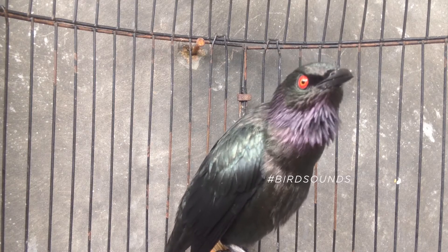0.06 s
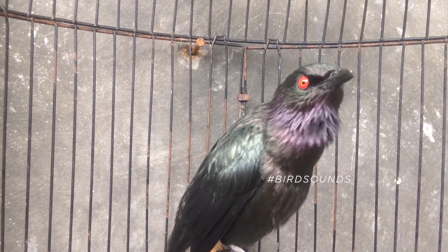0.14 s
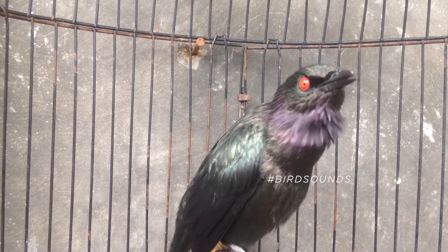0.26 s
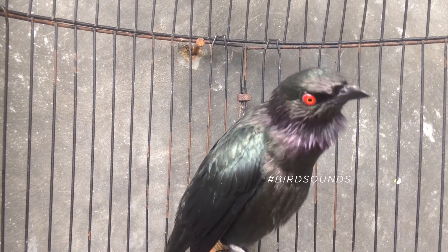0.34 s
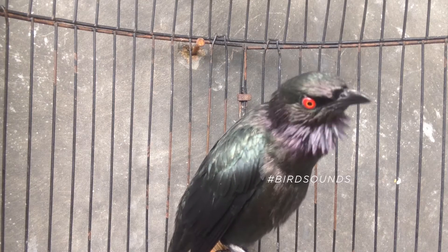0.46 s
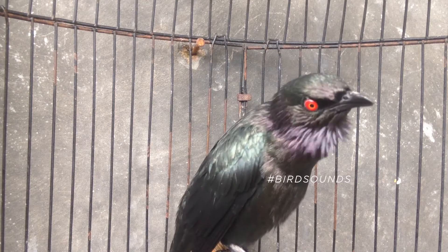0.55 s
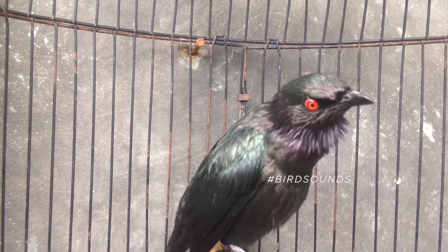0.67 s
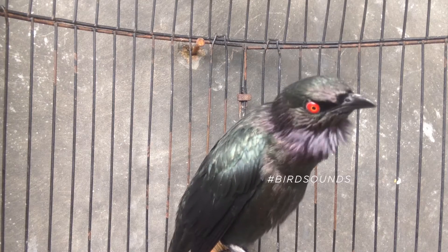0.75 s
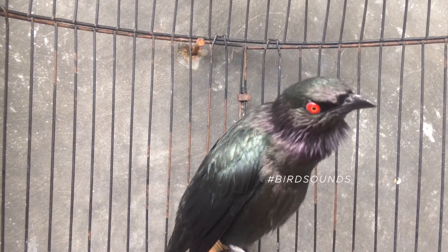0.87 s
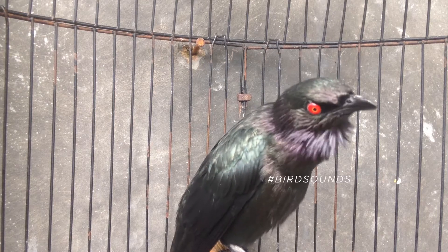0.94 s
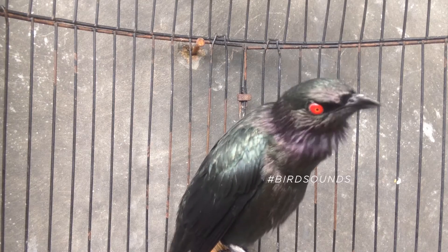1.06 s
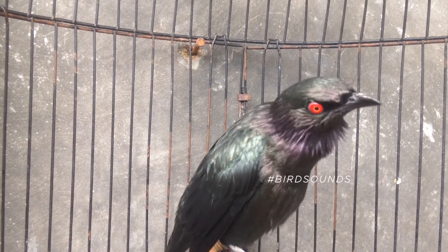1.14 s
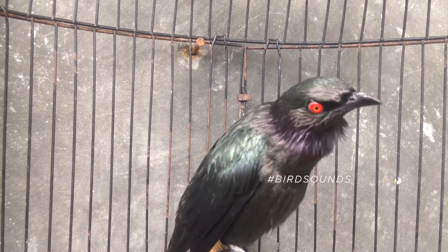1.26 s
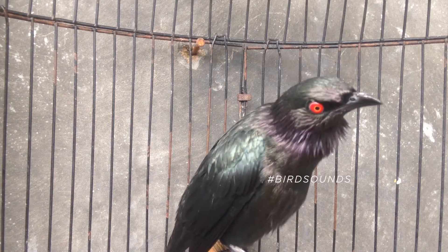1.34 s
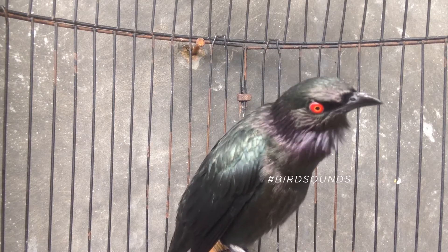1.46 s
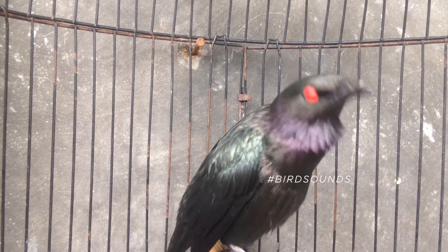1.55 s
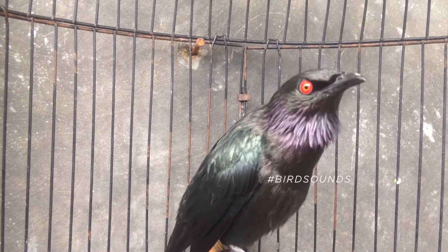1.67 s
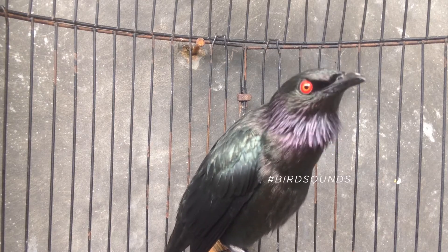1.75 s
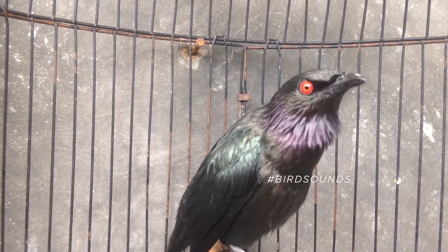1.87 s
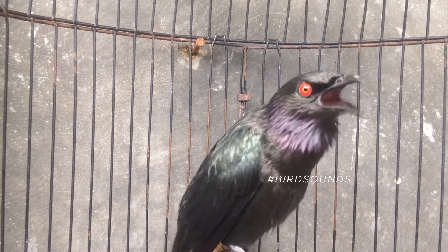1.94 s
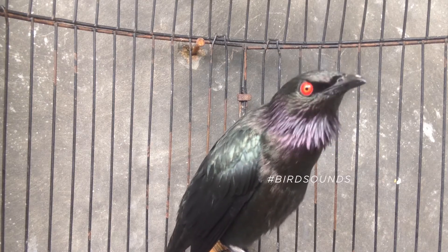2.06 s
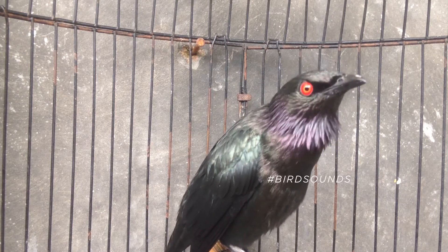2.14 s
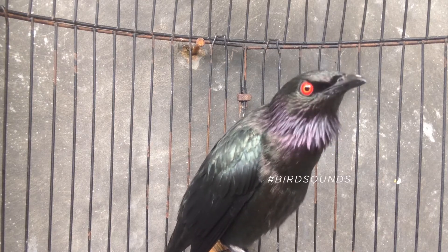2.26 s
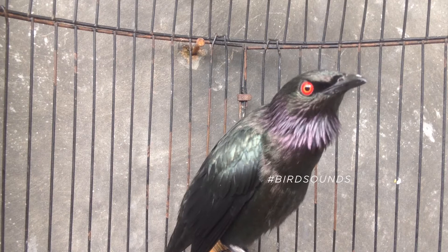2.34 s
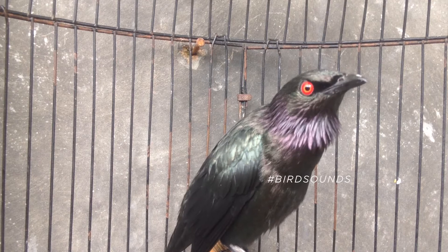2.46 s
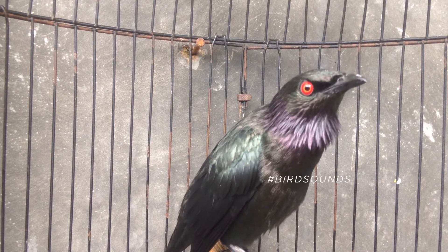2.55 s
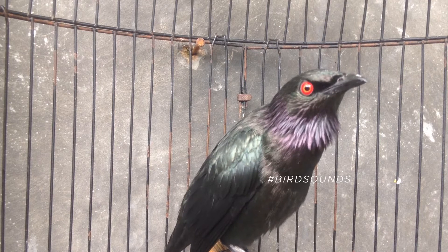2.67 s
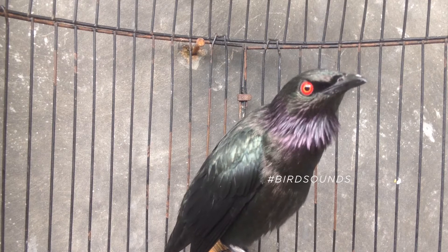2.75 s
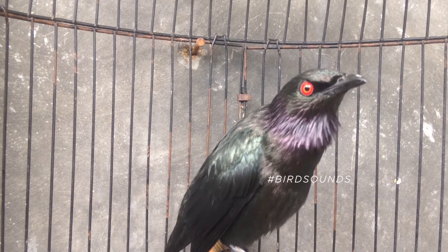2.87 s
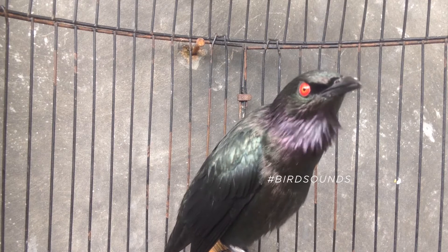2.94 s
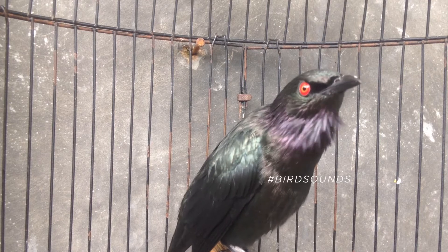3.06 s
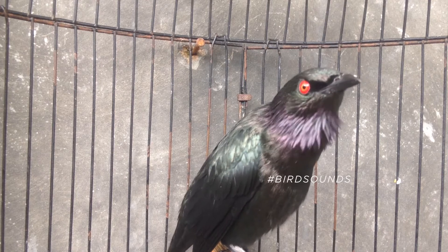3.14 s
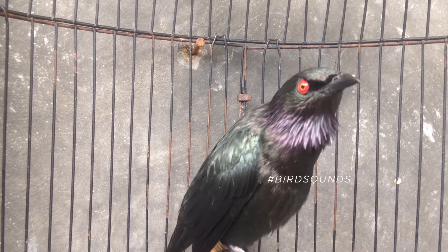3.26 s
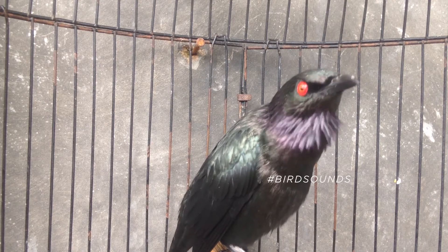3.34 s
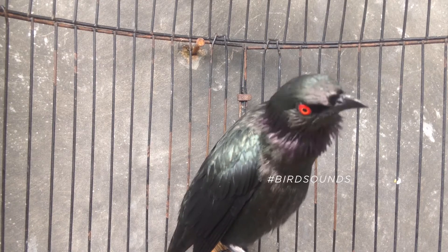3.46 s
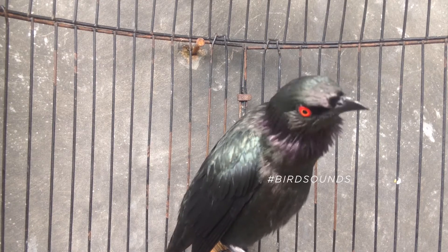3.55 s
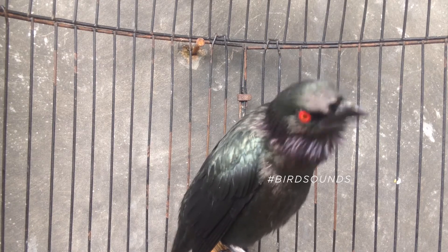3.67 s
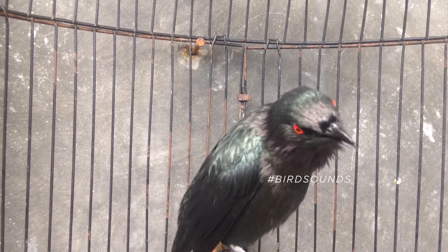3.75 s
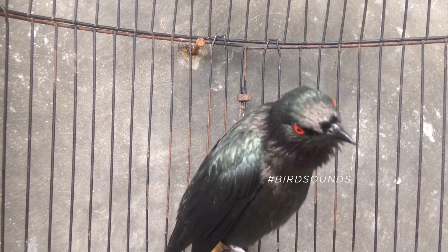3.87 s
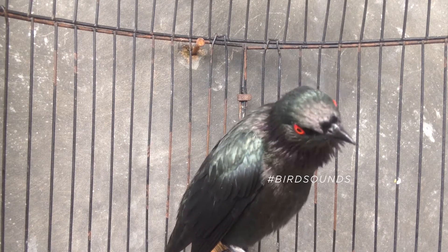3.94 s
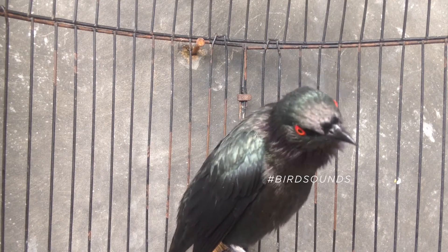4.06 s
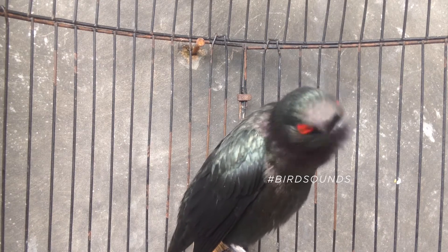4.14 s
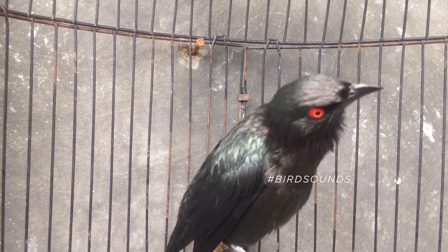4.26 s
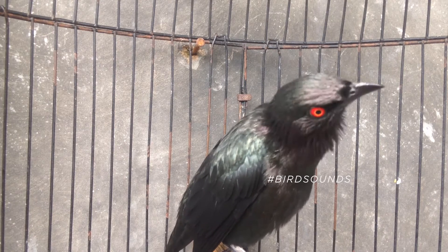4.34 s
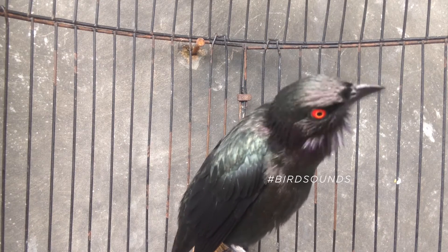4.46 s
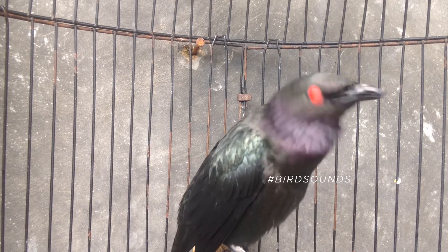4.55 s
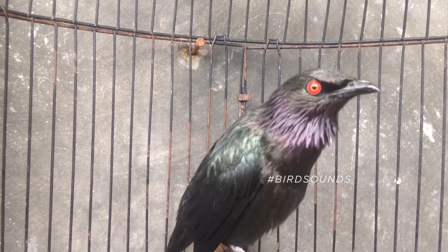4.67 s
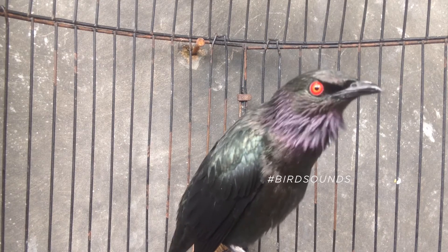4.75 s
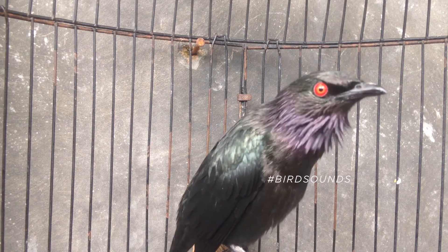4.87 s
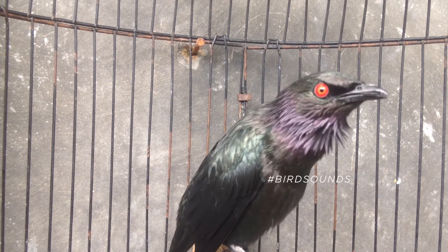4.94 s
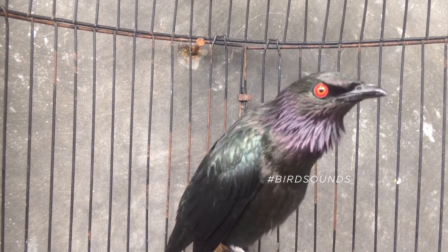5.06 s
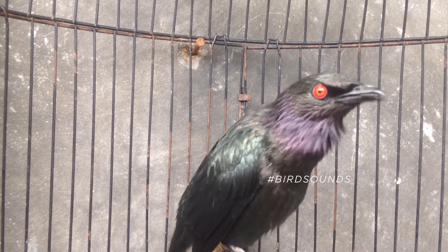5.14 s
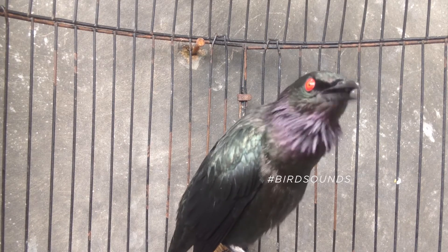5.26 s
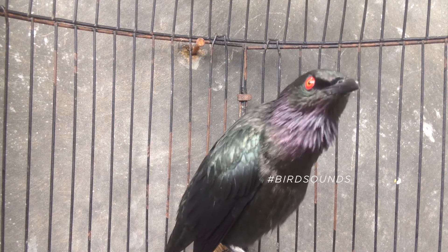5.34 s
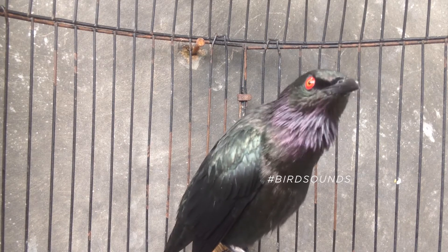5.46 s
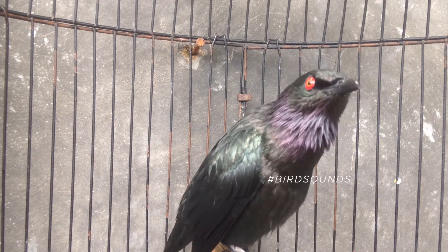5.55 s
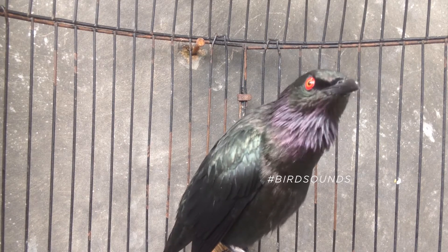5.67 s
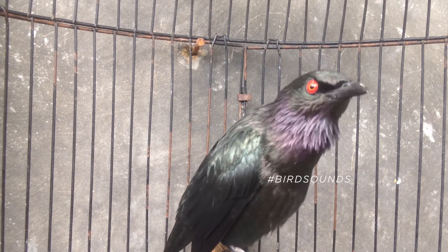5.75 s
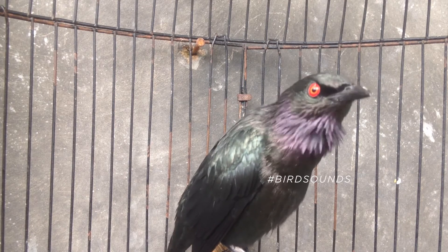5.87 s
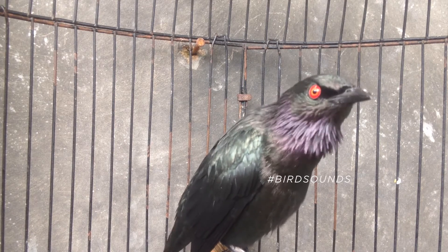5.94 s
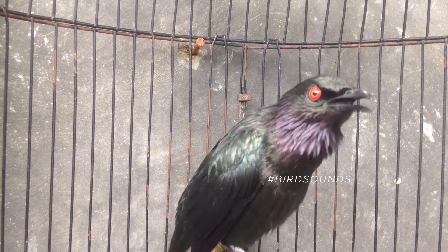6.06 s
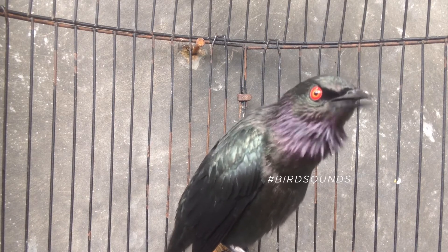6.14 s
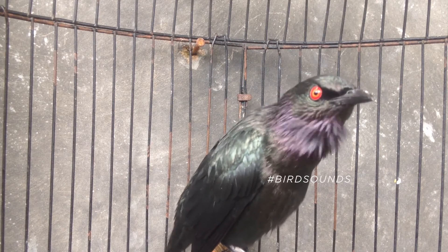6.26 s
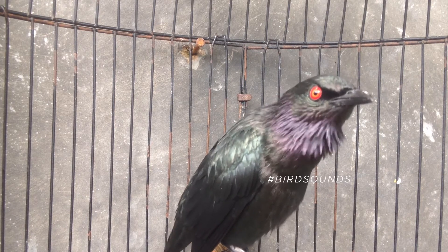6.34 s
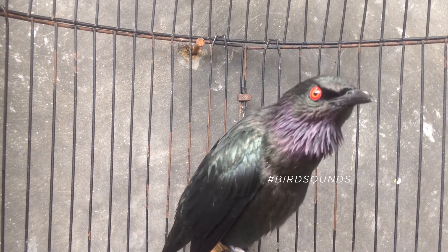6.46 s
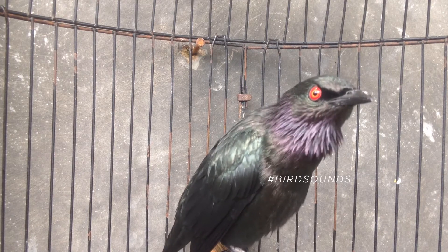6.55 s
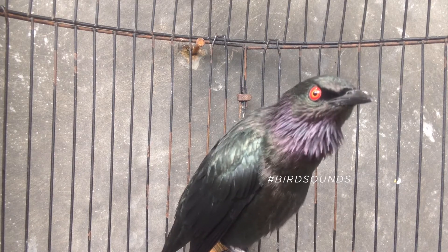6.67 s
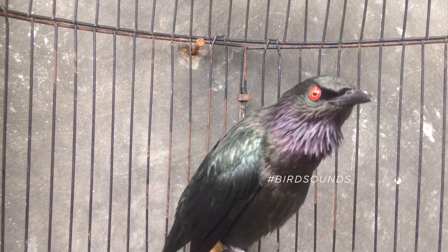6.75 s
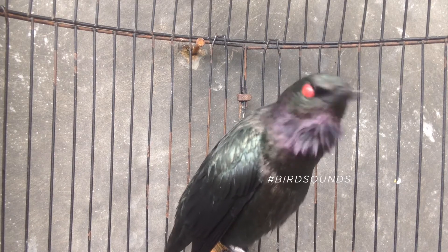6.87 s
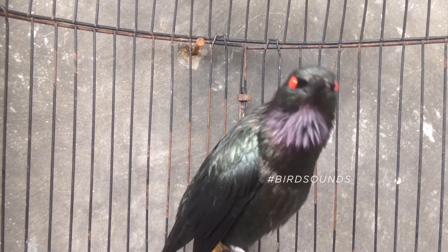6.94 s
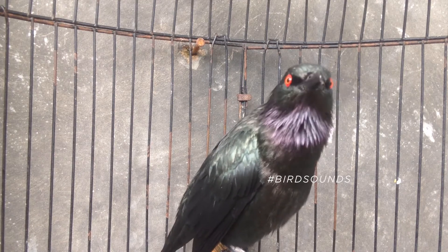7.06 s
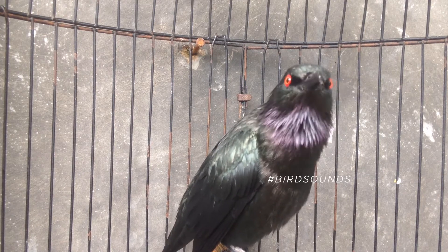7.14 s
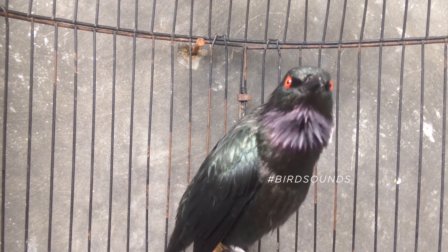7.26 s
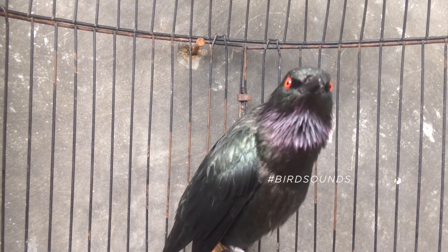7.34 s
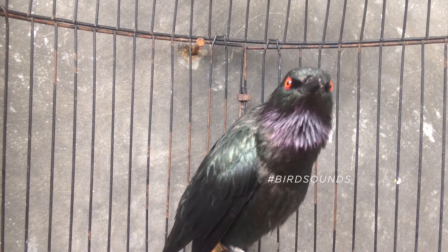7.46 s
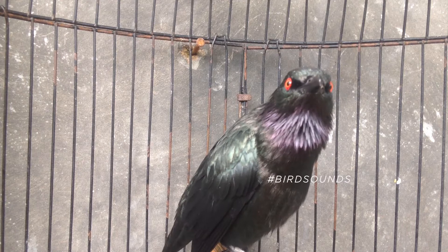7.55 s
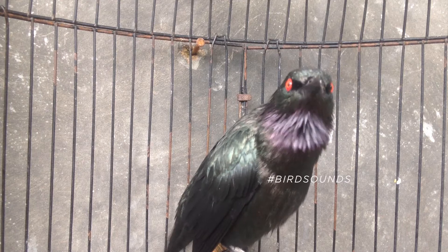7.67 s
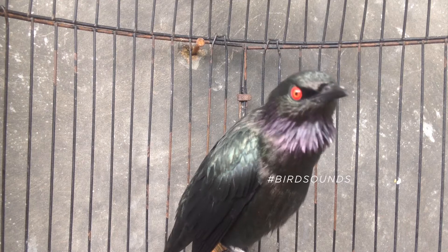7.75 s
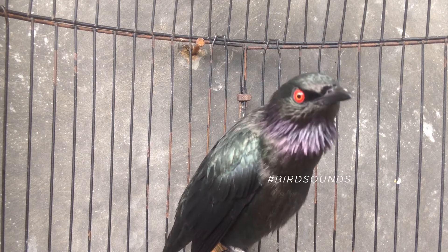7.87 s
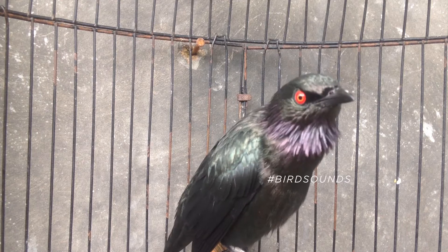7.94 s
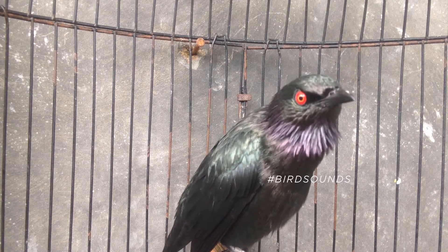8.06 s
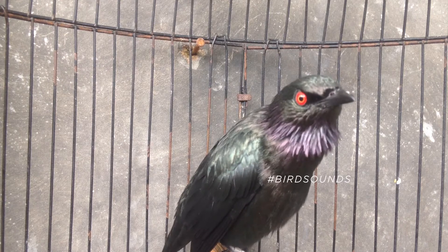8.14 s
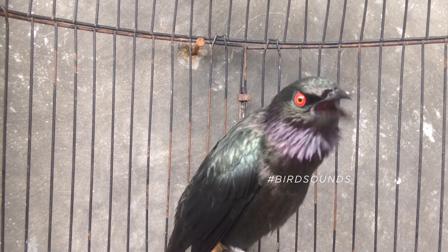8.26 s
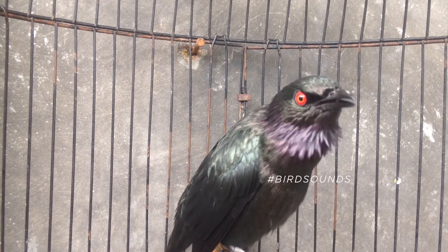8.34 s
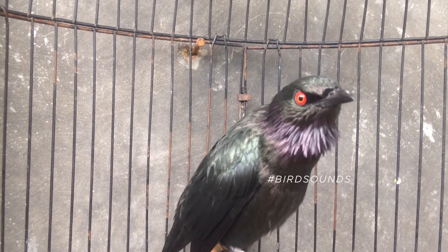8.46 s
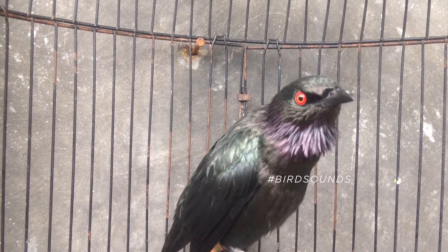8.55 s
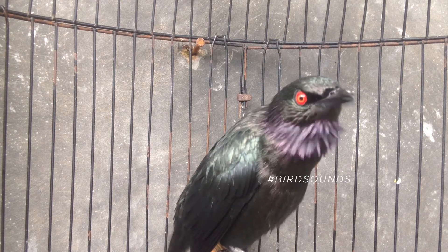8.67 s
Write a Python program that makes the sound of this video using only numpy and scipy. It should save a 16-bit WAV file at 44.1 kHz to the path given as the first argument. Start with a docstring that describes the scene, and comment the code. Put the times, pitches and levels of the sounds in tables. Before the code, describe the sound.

A close caged starling sings in a walled yard with short echoes. Low engine hum and airy hiss start clearer, then the hum fades by 1.6 s and remains faint to the end at 8.7 s. Quick chirps and a short rasp come at 0.1-0.4 s, hoarse warbled squeaks at 0.5-0.9, then a stepped metallic cluster at 1.05-1.2. The loudest piercing chirp hits at 2.0; background dips, then distant whistles answer until 3. A rattling croak at 3.2, small clicks at 3.5, a bright cluster at 3.8, another croak at 4.2. Squeaks at 4.55-5.0 and sharp whistled steps at 5.3-5.4 follow. A strong whistle rings at 6.2, a trilled low note near 7, a weak squeak at 7.3, low yelps at 7.8 and 8.0, and a rising squeal at 8.35-8.5. Sparrows chirp throughout; thin insect buzz runs 1.4-5.6, with soft cooing pulses around 2.1, 3.3 and 7.

```python
"""Distant birds whistle in a walled yard over engine hum and air hiss, made of filtered noise, to the end.
Almost at once a caged starling sings close by, in chirps, stepped whistles, trills and rasps: stacks of
overtones shaped by a throat. Short hisses and rasps of shaped noise come from it or another bird, and
sparrows chirp as rough sliding tones. Later insects buzz as thin bands of noise, soft pulses coo, perhaps
a far dove, croaks follow, and long whistles sweep near the end. Gain control ducks after loud notes."""
import sys
import numpy as np
from scipy import signal
from scipy.fft import rfft, irfft, next_fast_len
from scipy.io import wavfile
from scipy.ndimage import uniform_filter1d

SR = 44100
rng = np.random.default_rng(int(sys.argv[2]) if len(sys.argv) > 2 else 0)


def to_wav(s):
    """Save 16-bit WAV."""
    ch = np.atleast_2d(s).T  # columns
    pcm = np.round(np.clip(ch, -1, 1) * 32767)  # PCM
    wavfile.write(sys.argv[1], SR, pcm.astype(np.int16))


N = 383669

# All levels are those before the gain control.
# Yard background. Each row: time in seconds, hum level in dB, hiss level in dB.
YARD = [(0.0, -32, -43.5), (1.602, -46.5, -45.5), (8.7, -46, -49)]
# Far engines. Each row: pitch in Hz, half width in Hz, relative level in dB.
HUM = [(55.43, 5.2, 4), (112, 12, -7.5)]
# Colour of the air hiss. Each row: frequency in Hz, relative level in dB per Hz.
HISS = [(30, -15.5), (81, 4), (307, -15), (2910, -24.5), (6890, -38), (15500, -55.5)]
# Thin buzzes. Each row: start in seconds, end in seconds, pitch in Hz, middle level in dB.
INSECTS = [(1.42, 1.8, 9830, -73), (1.75, 5.6, 12490, -76.5)]
# Groups of soft low pulses. Each entry: time of the first pulse in seconds.
COOS = [2.067, 3.27, 6.95]
COO_GAP_S, COO_HZ, COO_DB = .055, 420, -39.5
# Distant whistles, one list each. Each row: time in seconds, pitch in Hz, level in dB.
FAR_WHISTLES = [
    [(0.0, 2750, -43), (0.1, 2740, -82)],
    [(1.17, 3048, -38.5), (1.35, 2623, -41), (1.58, 2743, -48.5)],
    [(2.21, 2310, -45.5), (2.31, 2820, -46), (2.4, 2302, -39.5), (2.5, 1957, -51.5), (2.6, 2750, -37),
     (2.68, 3137, -34), (2.75, 3080, -60)],
    [(2.87, 3800, -39.5), (2.89, 7470, -43.5), (2.96, 5430, -48.5), (3.03, 5060, -46)],
    [(4.24, 4630, -50), (4.33, 3815, -41), (4.56, 3266, -45.5)],
    [(3.23, 5320, -53), (3.4, 4520, -70)],
    [(.205, 5810, -45), (.3, 5850, -46)],
    [(5.5, 3060, -53.5), (5.7, 2887, -57.5)],
    [(5.59, 2276, -54), (5.77, 1966, -60)],
    [(6.505, 3330, -53), (6.56, 3340, -37)],
    [(6.36, 2511, -39.5), (6.55, 2504, -55)],
]
# Chirps of other birds. Each row: start in seconds, level in dB, highest pitch aimed at in Hz,
# length in seconds.
SPARROWS = [(0.373, -41, 5530, 0.081), (0.8, -34.5, 3804, 0.11), (1.757, -37.5, 4090, 0.032),
            (1.845, -34.5, 4160, 0.025), (1.945, -36.5, 4080, 0.043), (3.643, -42, 3055, 0.056),
            (5.836, -47.5, 3940, 0.19), (6.05, -52.5, 3860, 0.3), (6.559, -39.5, 3640, 0.03),
            (7.396, -42.5, 3810, 0.062), (7.51, -38.5, 3675, 0.028), (7.727, -36, 3720, 0.033),
            (8.448, -41.5, 3770, 0.081), (8.596, -36.5, 3726, 0.03), (8.635, -38.5, 3960, .035)]
CHATTER_HZ, SAG = 60, 0.12  # chirps are chopped about this often; share of pitch lost at their length

# How the throat favours some frequencies. Each row: frequency in Hz, relative level in dB.
THROAT = [(1500, -6.5), (3300, 8.5), (5000, 2.5), (6800, -5), (9000, -9), (16000, -28)]
# Short hisses and rasps, from the near bird or another. Each row: start in seconds, length in seconds,
# level in dB.
RASPS = [(0.199, .29, -46.5), (3.15, .03, -46.5), (4.844, .045, -42.5), (5.137, 0.058, -45.5),
         (6.892, 0.046, -46)]
# Shaken notes. Each row: start in seconds, end in seconds, rate in Hz, pitch swing 0-1, level swing 0-1.
TRILLS = [(0.53, 0.597, 297.6, 0.2, 0.7), (6.955, 7.05, 193.5, 0.09, 0.08)]
# Alternate cycles differ. Each row: start in seconds, end in seconds, half-pitch strength in dB.
HALVED = [(8.308, 8.4, 0.5)]
# Hoarse spells. Each row: start in seconds, end in seconds, added roughness in dB.
HOARSE = [(0.538, 0.718, -8), (0.83, 0.869, -9), (3.76, 3.84, -9), (1.04, 1.12, -10), (4.55, 4.64, -9)]
SLIDE_ROUGH_S = .008  # roughness gained per unit of relative pitch change a second
# Brief loud catches inside croaking notes. Each entry: time in seconds.
CATCHES = [.845, 3.236, 4.226]
CATCH_DB = 7
# Croaks. Each row: start in seconds, peak level in dB.
CROAKS = [(3.17, -31.5), (4.161, -30.5)]
CROAK_S, CROAK_FROM_HZ, CROAK_HZ, DROP_S = .098, 2150, 800, .011  # the pitch drops fast, then rests
CROAK_FADE_DB, CROAK_SLOPE_DB, CROAK_RASP_DB = 8, -2, -13
RATTLE_HZ, RATTLE_PITCH, RATTLE_LEVEL = 540, .2, .5  # the croak's second membrane: rate and swings 0-1
# The beak is shut for notes starting near these times. Each entry: time in seconds.
CLOSED = [.815, 3.48, 7.33] + [s for s, _ in CROAKS]
CLOSED_SHIFT = .76  # a shut beak lowers the ring of the throat by this ratio

# Curved glides. Each row: start in seconds, length in seconds, from Hz, to Hz, bend (over 1 moves late,
# under 1 early), peak level in dB, peak place 0-1, fade from the peak to both ends in dB,
# overtone slope in dB per octave.
GLIDES = [ (.105, 0.036, 2015, 750, 1.37, -22, 0.35, 14.5, -3),
          (.325, 0.041, 4220, 3040, 1.44, -17, 0.86, 21.5, -4),
          (.638, 0.078, 1770, 1543, 2, -23, 0, 21, -1), (1.992, 0.054, 4420, 2775, 5, -11, 0.96, 29, 8),
          (2.047, 0.039, 4990, 5044, 0.5, -8, 0.1, 11.5, 5.5),
          (4.645, 0.053, 1587, 2042, 6.8, -20, 0.58, 12.5, 0), (5.003, .1, 1918, 1407, 2.37, -28, 0, 8, -4),
          (6.952, 0.099, 1323, 1175, 1, -28.5, 0, 30.5, -23.5)]
# Short straight steps. Each row: start in seconds, length in seconds, from Hz, to Hz, peak level in dB.
STEPS = [(0.301, 0.02, 4120, 4250, -25), (.538, .051, 1351, 1700, -30.5), (1.044, 0.015, 1927, 4330, -29.5),
         (1.087, 0.027, 1797, 1745, -21), (1.106, 0.016, 3257, 3266, -16.5),
         (1.119, 0.026, 2118, 2251, -15.5), (1.141, 0.026, 3006, 3156, -21.5),
         (1.322, .024, 1132, 799.7, -31), (1.586, 0.041, 1168, 794, -39.5),
         (3.015, 0.027, 1670, 1368, -32.5), (3.461, .015, 1042, 916, -29.5), (3.48, 0.014, 1008, 924, -28),
         (3.493, .04, 1119, 980.5, -33.5), (3.764, 0.023, 2010, 3294, -27.5),
         (3.781, 0.035, 2470, 2403, -17.5), (3.789, .024, 3580, 3430, -19.5),
         (3.815, 0.013, 1661, 1637, -17.5), (3.831, 0.01, 2950, 2804, -20), (3.836, 0.027, 2117, 2080, -15),
         (3.863, 0.029, 3120, 3138, -14.5), (4.554, 0.022, 1910, 3375, -27.5),
         (4.616, 0.018, 1565, 1633, -23.5), (4.876, 0.019, 1656, 1347, -32),
         (4.892, 0.043, 1178, 935, -33.5), (4.957, 0.05, 3164, 2630, -27.5),
         (5.294, 0.013, 3695, 3420, -22), (5.341, 0.04, 2330, 2600, -22.5),
         (5.964, 0.038, 2447, 1599, -28.5), (6.382, 0.053, 1486, 1370, -35.5),
         (6.928, .02, 2814, 2697, -21.5)]
STEP_PEAK, STEP_FADE_DB = .45, 3  # place of the peak 0-1; loss from there to both ends
# Overtone slope at -18 dB and 2 kHz; louder is brighter, higher is purer.
STEP_SLOPE_DB, PER_LEVEL, PER_OCTAVE_DB = 0, 0.86, -7.5
# Notes held steady that drop or flick up at the very end. Each row: start in seconds, length in seconds,
# from Hz, to Hz, peak level in dB, overtone slope in dB per octave.
HOOKS = [(0.647, .049, 2161, 2990, -28.5, -11), (1.065, .031, 3076, 1847, -16, -6.5),
         (4.573, 0.037, 2888, 2370, -20.5, -9), (5.267, 0.026, 4117, 3070, -30, -2.5),
         (5.378, .028, 3840, 2890, -16.5, -9.5)]
HOOK_BEND = 4.5
# Notes that rise to a flat top and fall again. Each row: start in seconds, length in seconds, from Hz,
# top Hz, to Hz, top place 0-1, peak level in dB, overtone slope in dB per octave.
ARCHES = [(0.582, 0.06, 1882, 2377, 2155, 0.75, -25, -8), (0.82, .057, 957, 1106, 894, 0.4, -30.5, -1),
          (5.307, .023, 2430, 3446, 2693, .45, -14.5, -11),
          (5.331, .019, 2694, 3487, 3070, 0.6, -18.5, -17), (7.776, .042, 822, 1121, 790, 0.6, -20.5, 1),
          (8.001, 0.056, 920, 1092, 809, 0.3, -21, -0.5)]
FLAT_TOP, ARCH_FADE_DB = 3.1, 12  # power of the fall from the top; level lost at both ends
# Free whistles. Each row: overtone slope in dB per octave, then a list of points, each with time in
# seconds, pitch in Hz, level in dB.
SWEEPS = [ (-3.5, [(6.16, 4790, -39), (6.167, 3764, -30), (6.175, 4540, -23.5), (6.215, 4735, -11),
          (6.247, 4400, -13.5), (6.265, 3187, -14)]), (-6.5, [(7.33, 759, -38), (7.338, 1314, -34),
          (7.352, 2042, -40), (7.366, 1378, -30), (7.374, 1010, -34.5)]), (-8.5, [(8.326, 2946, -38),
          (8.345, 3876, -33), (8.395, 3620, -33), (8.415, 3870, -30.5), (8.455, 4700, -16),
          (8.476, 4154, -20)])]
# A note that follows another within JOINED_S slides over from its last pitch.
SLUR_S, JOINED_S = .0018, .006

DUCK_FROM_DB, DUCK_POWER, RECOVER_S = -27, 0.25, 0.26  # gain control
TOP_HZ = 15600  # nothing is kept above this


def amp(db):
    """Turn decibels into a plain factor."""
    return 10 ** (np.asarray(db) / 20)


def unit(x):
    """Scale a sound to rms 1."""
    return x / np.sqrt(np.mean(x ** 2) + 1e-20)


def along(points, hz):
    """Read a value between (Hz, value) points on a log axis."""
    f, v = np.transpose(points)
    return np.interp(np.log(hz + 1), np.log(f + 1), v)


def filtered(x, response):
    """Multiply the spectrum of x by a response of frequency."""
    m = next_fast_len(len(x) + 8192)
    spectrum = rfft(x, m) * response(np.fft.rfftfreq(m, 1 / SR))
    return irfft(spectrum, m)[:len(x)]


def noise(count, response):
    """Coloured noise of rms 1."""
    return unit(filtered(rng.standard_normal(count), response))


def soft(count, hz):
    """A smooth random curve of rms 1 that moves about hz times a second."""
    return noise(count, lambda f: 1 / (1 + (f / hz) ** 2))


def gate(t, start, end, edge):
    """1 between start and end, with soft edges."""
    return np.clip(np.minimum(t - start, end - t) / edge, 0, 1)


def swell(u, db, place, fade_db):
    """Gain that peaks at a place 0-1 in the note; also the distance 0-1 from that place."""
    away = np.where(u < place, 1 - u / place, (u - place) / (1 - place))
    return amp(db - fade_db * away ** 2), away


def read(note, edge):
    """First sample, times, pitch and gain of a note given as points."""
    s, hz, db = np.transpose(note)
    first = round(s[0] * SR)
    t = np.arange(first, round(s[-1] * SR)) / SR
    rounding = round(np.diff(s).min() * SR / 2)  # pitch corners are rounded over half the shortest step
    hz = uniform_filter1d(np.interp(t, s, hz), rounding, mode="nearest")
    return first, t, hz, amp(np.interp(t, s, db)) * gate(t, s[0], s[-1], edge)


def echoes(x, t60):
    """The yard walls answer with a dying noise tail, drawn anew every quarter second."""
    wet, step, t = np.zeros(N + SR), SR // 4, np.arange(SR // 2) / SR
    for k in range(0, N, step):
        tail = rng.standard_normal(len(t)) * amp(-60 * t / t60) * np.minimum(t / .01, 1)
        part = signal.fftconvolve(x[k:k + step], tail / np.linalg.norm(tail))
        wet[k:k + len(part)] += part
    return wet[:N]


def yard():
    """Engine hum is noise peaking at a few low pitches; air hiss is patchy broad noise."""
    t = np.arange(N) / SR
    s, hum_db, hiss_db = np.transpose(YARD)
    hum = noise(N, lambda f: sum(amp(db) / (1 + ((f - hz) / wide) ** 2) for hz, wide, db in HUM))
    hiss = noise(N, lambda f: amp(along(HISS, f)))
    hum_gain = amp(np.interp(t, s, hum_db))
    hiss_gain = amp(np.interp(t, s, hiss_db) + soft(N, hz=2.8))
    return hum_gain * hum + hiss_gain * hiss


def insects():
    """Narrow high bands of noise that swell a little."""
    out, t = np.zeros(N), np.arange(N) / SR
    for start, end, hz, db in INSECTS:
        buzz = noise(N, lambda f: np.exp(-((f - hz) / 300) ** 2))
        gain = amp(db + 2.5 * soft(N, hz=2.6)) * gate(t, start, end, 0.039)
        out += gain * buzz
    return out


def coos():
    """Soft low pulses in groups of four, perhaps a far dove: a low tone under a bell-shaped swell."""
    out, t = np.zeros(N), np.arange(-600, 600) / SR
    pulse = amp(COO_DB) * np.exp(-(t / 0.0055) ** 2) * np.sin(2 * np.pi * COO_HZ * t)
    for s in COOS:
        for k in range(4):
            first = round((s + k * COO_GAP_S + t[0]) * SR)
            out[first:first + len(t)] += pulse
    return out


def whistles():
    """Distant birds: nearly pure tones that flutter on the way."""
    out = np.zeros(N)
    for note in FAR_WHISTLES:
        first, t, hz, gain = read(note, edge=0.0057)
        phase = 2 * np.pi * np.cumsum(hz) / SR
        tone = np.sin(phase) + amp(-28.5) * np.sin(2 * phase)
        flutter = 1 + 0.8 * soft(len(t), hz=120)
        out[first:first + len(t)] += gain * flutter * tone
    return out


def sparrows():
    """Each chirp sweeps up, warbles hoarsely in a fast chatter, and falls."""
    out, t = np.zeros(N + SR), np.arange(SR // 2) / SR
    for s, db, hz, length in SPARROWS:
        sweep_up = 0.28 * np.exp(-t / (.2 * length))
        fall = SAG * np.minimum(t / length, 1.5) ** 2
        warble_hz = 210 * soft(len(t), hz=300)
        phase = 2 * np.pi * np.cumsum(hz * (1 - sweep_up - fall) + warble_hz) / SR
        rasp = noise(len(t), lambda f: amp(along(THROAT, f)) * (f > hz / 2))
        chatter = amp(6.2 * soft(len(t), CHATTER_HZ))
        shape = chatter * (1 - np.exp(-t / 0.011)) * np.exp(-(t / length) ** 4)
        voice = np.sin(phase) + amp(-22.5) * np.sin(2 * phase) + 0.27 * rasp
        out[round(s * SR):][:len(t)] += amp(db) * shape * voice
    return out[:N]


def rasps():
    """Short unpitched hisses and rasps, from the near bird or another: flickering noise, throat-coloured."""
    t = np.arange(N) / SR
    level = sum(amp(db) * gate(t, s, s + length, 0.01) for s, length, db in RASPS)
    hiss = noise(N, lambda f: amp(along(THROAT, f)) * (f > THROAT[0][0]))
    return level * amp(2 * soft(N, hz=148)) * hiss


def straight_notes():
    """Glides, steps and hooks in one list, all with the columns of the glides."""
    notes = list(GLIDES)
    for s, length, a, b, db in STEPS:
        octaves = np.log2((a + b) / 2 / 2000)
        slope_db = STEP_SLOPE_DB + PER_LEVEL * (db + 18) + PER_OCTAVE_DB * octaves
        notes.append((s, length, a, b, 1, db, STEP_PEAK, STEP_FADE_DB, slope_db))
    for s, length, a, b, db, slope_db in HOOKS:
        notes.append((s, length, a, b, HOOK_BEND, db, STEP_PEAK, STEP_FADE_DB, slope_db))
    return sorted(notes)


def song():
    """Give every starling note as start in seconds, pitch in Hz, gain and overtone slope."""
    span = lambda length: np.linspace(0, 1, round(length * SR))
    last_s, last_hz = 0, 0
    for s, length, from_hz, to_hz, bend, db, place, fade_db, slope_db in straight_notes():
        u = span(length)
        hz = from_hz + (to_hz - from_hz) * u ** bend
        if abs(s - last_s) < JOINED_S:
            hz += (last_hz - from_hz) * np.exp(-u * length / SLUR_S)
        last_s, last_hz = s + length, to_hz
        yield s, hz, swell(u, db, place, fade_db)[0], slope_db
    for s, length, from_hz, top_hz, to_hz, place, db, slope_db in ARCHES:
        u = span(length)
        gain, away = swell(u, db, place, ARCH_FADE_DB)
        end_hz = np.where(u < place, from_hz, to_hz)
        yield s, top_hz - (top_hz - end_hz) * away ** FLAT_TOP, gain, slope_db
    for s, db in CROAKS:
        u = span(CROAK_S)
        hz = CROAK_HZ + (CROAK_FROM_HZ - CROAK_HZ) * np.exp(-u * CROAK_S / DROP_S)
        yield s, hz, swell(u, db, STEP_PEAK, CROAK_FADE_DB)[0], CROAK_SLOPE_DB
    for slope_db, note in SWEEPS:
        first, t, hz, gain = read(note, edge=SLUR_S)
        yield first / SR, hz, gain, slope_db


def roughness(t, hz):
    """How uneven the cycles are: a little always, more in hoarse spells, croaks and fast slides."""
    croaky = [(at, at + CROAK_S, CROAK_RASP_DB) for at, _ in CROAKS]
    rough = amp(-16) + sum(amp(db) * gate(t, start, end, 0.0063) for start, end, db in HOARSE + croaky)
    slide = SR * abs(np.gradient(np.log(hz)))
    return rough + np.minimum(SLIDE_ROUGH_S * slide, .5)


def shaken(t, hz, gain):
    """A second, slower membrane shakes pitch and level in trills and croaks."""
    rattles = [(at, at + CROAK_S, RATTLE_HZ, RATTLE_PITCH, RATTLE_LEVEL) for at, _ in CROAKS]
    for start, end, rate_hz, swing, depth in TRILLS + rattles:
        shake = gate(t, start, end, 0.0055) * np.sin(2 * np.pi * rate_hz * t)
        hz, gain = hz * (1 + swing * shake), gain * abs(1 + depth * shake)
    return hz, gain


def overtones(t, hz, gain, slope_db, shift, order):
    """Strength of each overtone, from the note's slope, its effort and the throat."""
    effort = np.sqrt(gain / gain.max())  # softer moments are duller
    slope_db = slope_db - 2.2 * (2.0 - effort)
    weight = amp(slope_db * np.log2(order) + along(THROAT, order * hz / shift))
    weight *= order * hz < TOP_HZ
    weight *= amp([2.5 * soft(len(t), hz=40) for _ in order])  # each overtone wavers on its own
    half = sum(amp(db) * gate(t, start, end, 0.017) for start, end, db in HALVED)
    weight[::2] *= half * order[::2] ** 3  # the in-between tones sound only where cycles alternate
    return weight / np.sqrt(np.sum(weight ** 2, axis=0) / 2)


def starling():
    """The syrinx makes a stack of overtones; the throat weights them; turbulence roughens every cycle."""
    out = np.zeros(N)
    order = np.arange(1, 33)[:, None] / 2  # half orders too
    for s, hz, gain, slope_db in song():
        first = round(s * SR)
        t = (first + np.arange(len(hz))) / SR
        gain = gain * gate(t, t[0], t[-1], edge=.0012)
        gain = gain * amp(sum(CATCH_DB * np.exp(-((t - at) / 0.0025) ** 2) for at in CATCHES))
        shift = CLOSED_SHIFT if np.min(abs(s - np.array(CLOSED))) < .03 else 1
        rough = roughness(t, hz)
        hz, gain = shaken(t, hz, gain)
        weight = overtones(t, hz, gain, slope_db, shift, order)
        uneven = lambda: rough * soft(len(t), hz=404)
        jitter_hz = 95 * uneven()  # uneven cycles smear high overtones most
        phase = 2 * np.pi * np.cumsum(hz + jitter_hz) / SR
        spread = .25 * order ** 2  # the throat spreads each pulse
        tone = np.sum(weight * np.cos(order * phase + spread), axis=0)
        air = noise(len(t), lambda f: amp(along(THROAT, f / shift)) * (f > hz.min()))
        breath = rough * (1 + np.cos(phase)) * air  # a puff each cycle
        out[first:first + len(t)] += gain * (tone * (1 + .5 * uneven()) + 0.2 * breath)
    # The two sides of the syrinx mix into sum and difference tones.
    return out + 0.27 * filtered(out ** 2, lambda f: f > CROAK_HZ)


def scene():
    """Add the background, the far birds and the near sounds, with echoes of all but the background."""
    background = yard() + insects() + coos()
    far = whistles() + sparrows()
    near = rasps() + starling()
    far_echo = echoes(far, t60=0.26)
    near_echo = amp(-18.0) * echoes(near, t60=0.14)
    return (background + far + far_echo + near + near_echo)[None]


def record(dry):
    """Gain control ducks after loud notes and recovers; nothing is kept above the band limit."""
    keep = np.exp(-1 / (RECOVER_S * SR))
    power = signal.lfilter([1 - keep], [1, -keep], dry[0] ** 2)
    ducked = dry[0] * (1 + power / amp(2 * DUCK_FROM_DB)) ** -DUCK_POWER
    return filtered(ducked, lambda hz: hz < TOP_HZ)[None]


dry = scene()
out = record(dry)
to_wav(out)
```